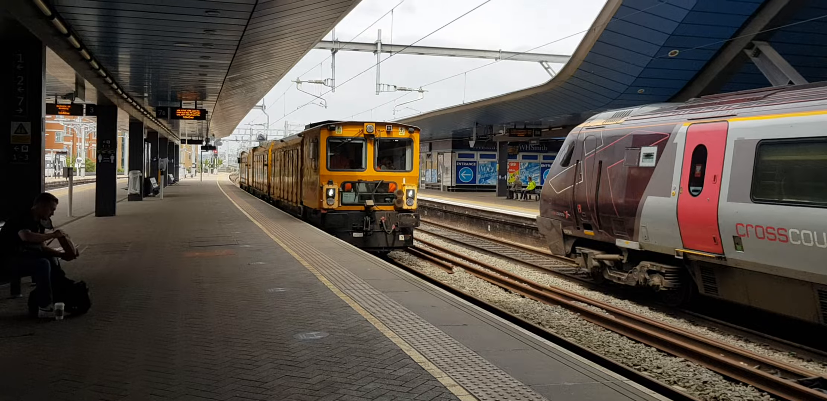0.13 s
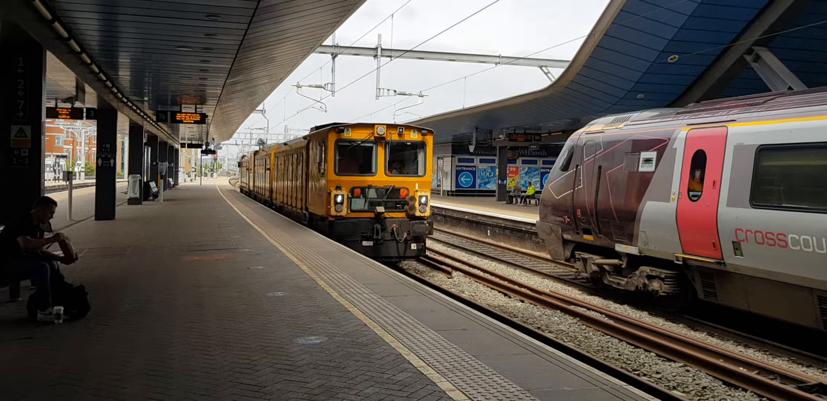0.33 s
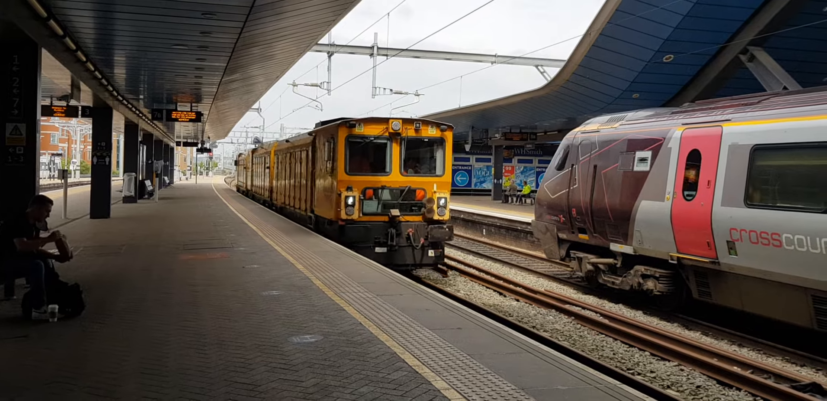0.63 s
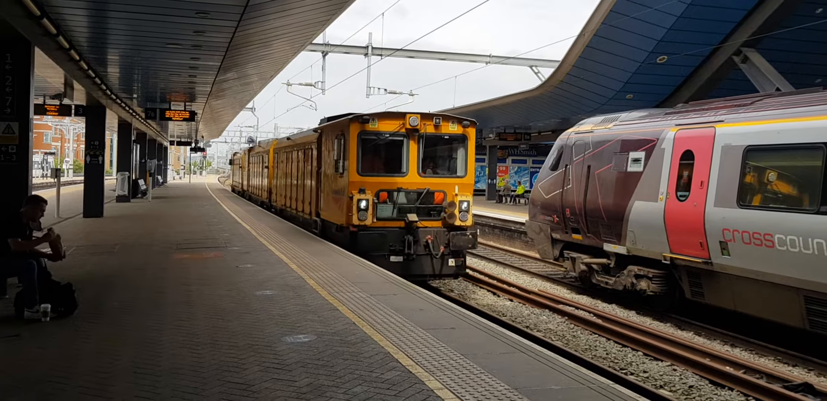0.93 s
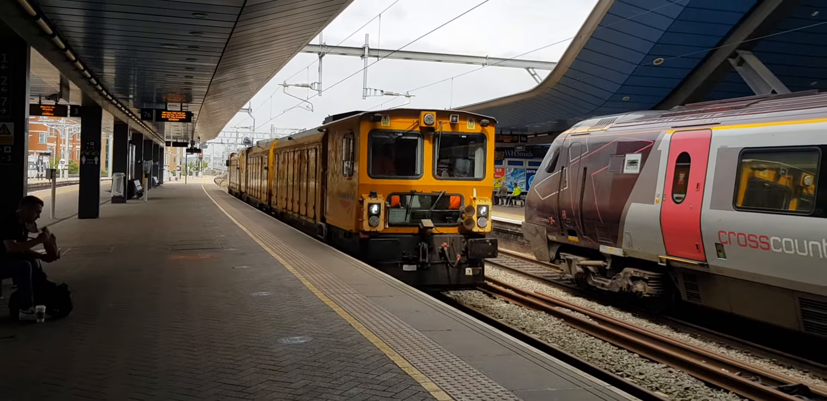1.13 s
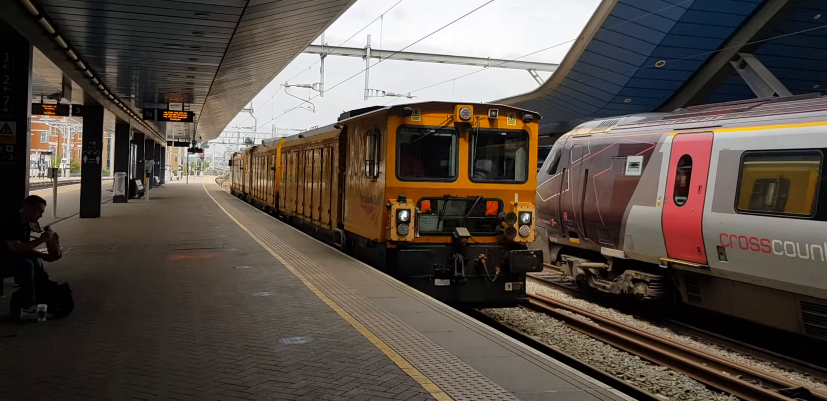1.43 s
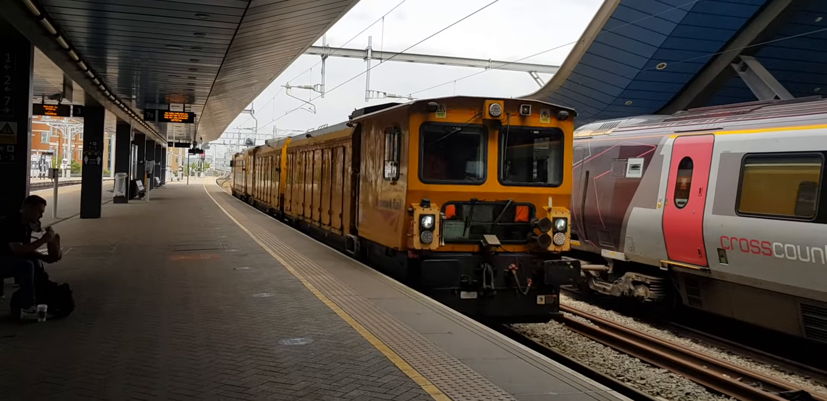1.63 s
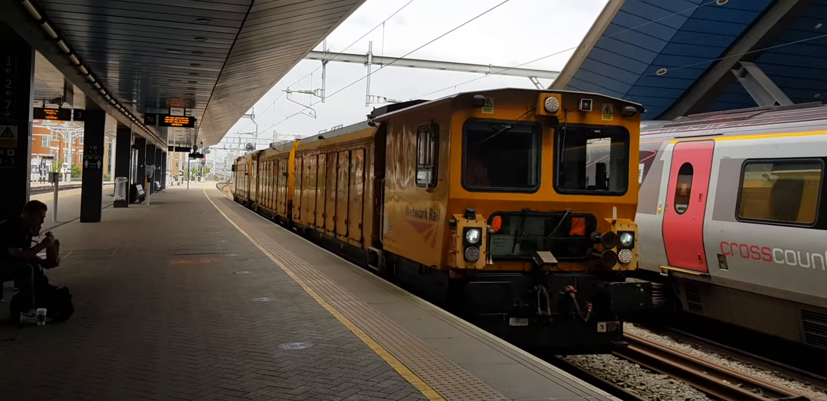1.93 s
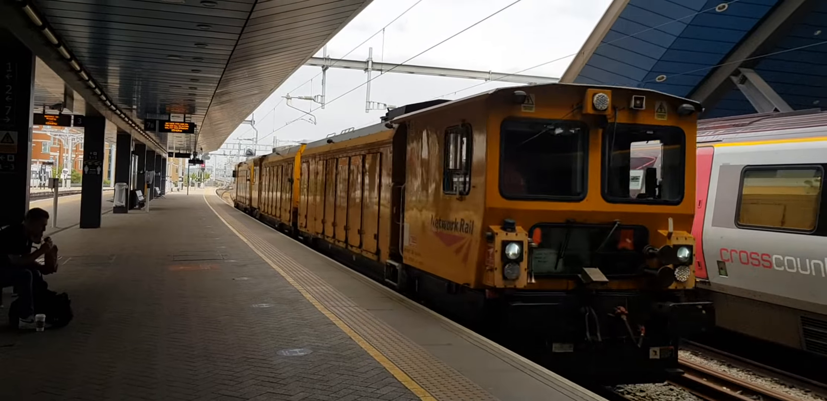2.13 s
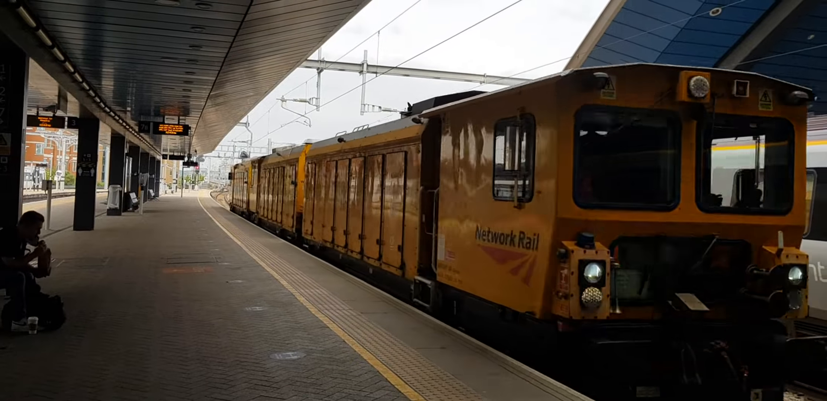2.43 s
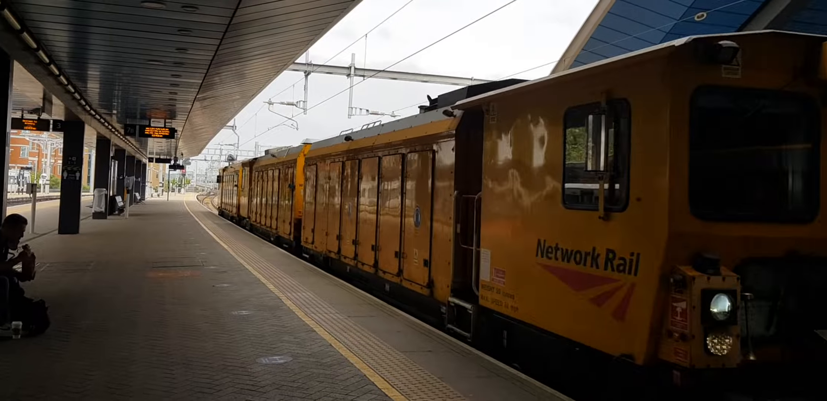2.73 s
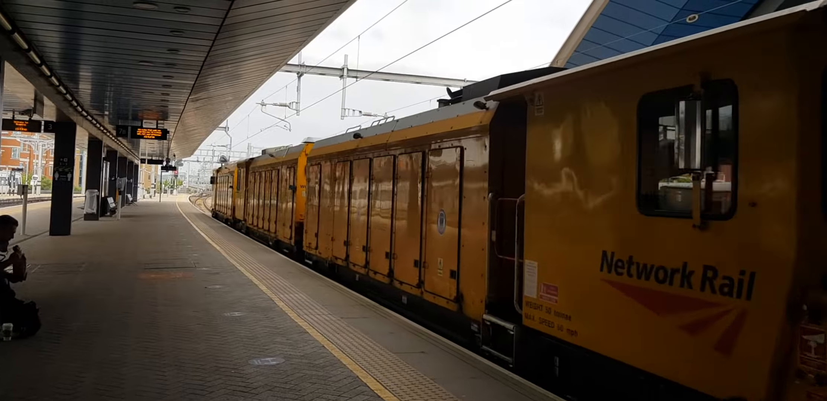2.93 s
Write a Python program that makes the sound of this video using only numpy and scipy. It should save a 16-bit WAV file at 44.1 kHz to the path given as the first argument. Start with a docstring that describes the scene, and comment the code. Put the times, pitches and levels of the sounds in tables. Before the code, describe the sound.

Steady diesel idling fills a covered station platform, bassy and droning, with flickering gear and fan whines above. A second train rolls in, its wheel rumble growing strongest at the end, heard in wide stereo from the platform.

```python
"""A covered station platform: diesel engines of a standing train idle steadily while a works train rolls closer.
The roar, rumble and beds of whine are filtered noise; whines and most hums are randomly modulated carriers.
Clatter is a noise loop repeated every engine cycle, and the exhausts are sums of harmonics of the cycle rate.
The sources are built as mid and side, and the two channels agree only in the bass, as in a diffuse field."""
import sys
import numpy as np
from scipy import signal
from scipy.fft import rfft, irfft, next_fast_len
from scipy.io import wavfile
from scipy.ndimage import uniform_filter1d, map_coordinates

SR = 44100
rng = np.random.default_rng(int(sys.argv[2]) if len(sys.argv) > 2 else 0)


def wrap_up_sound(samples):
    """Save the sound to the file named by the first command line argument, as 16-bit audio."""
    columns = np.atleast_2d(samples).T
    # keep every value between -1 and 1, then stretch to whole-number steps
    tamed = np.clip(columns, -1, 1)
    steps = np.round(tamed * 32767).astype(np.int16)
    wavfile.write(sys.argv[1], SR, steps)


N = 136710  # samples


def amp(db):
    """Level law: the amplitude ratio of a level in dB."""
    return 10 ** (np.asarray(db) / 20)


def unit(x):
    """Power normalisation: scale the whole signal to an rms of 1."""
    return x / np.sqrt(np.mean(x ** 2) + 1e-20)


def along(points, hz):
    """Logarithmic pitch: interpolate (Hz, value) points on a log frequency axis."""
    point_hz, value = np.transpose(points)
    return np.interp(np.log(hz + 1), np.log(point_hz + 1), value)


def clock():
    """Uniform sampling: the time of each sample in seconds."""
    return np.arange(N) / SR


def wobble(knots_per_s):
    """Band-limited fluctuation: a smooth curve through random knots."""
    knots = rng.standard_normal(int(N * knots_per_s / SR) + 4)
    return map_coordinates(knots, [np.arange(N) * knots_per_s / SR])


def filtered(x, response):
    """Linear filtering: multiply the spectrum by a function of frequency."""
    size = next_fast_len(N + 8192)
    spectrum = rfft(x, size) * response(np.fft.rfftfreq(size, 1 / SR))
    return irfft(spectrum, size)[..., :N]


def patches(pair, patchy_db):
    """Local modulation: random gain in patches of time and frequency, shared by mid and side."""
    bins = signal.stft(pair, nperseg=1024)[2]
    field = uniform_filter1d(rng.standard_normal(bins.shape[1:]), size=9, axis=0)  # across frequency
    field = uniform_filter1d(field, size=7, axis=1)  # across time
    return signal.istft(bins * amp(patchy_db * unit(field)), nperseg=1024)[1][:, :N]


def rush(colour, patchy_db):
    """Coloured noise: independent mid and side shaped by a spectrum, with an rms of 1."""
    white = rng.standard_normal((2, N))
    return unit(filtered(patches(white, patchy_db), lambda hz: amp(along(colour, hz))))


def narrow(hz, width_hz, seconds):
    """Quadrature modulation: slow random weights on cosine and sine spread a line about hz."""
    turn = 2 * np.pi * hz * seconds
    mid_and_side = [wobble(width_hz) * np.cos(turn) + wobble(width_hz) * np.sin(turn) for _ in range(2)]
    return unit(np.array(mid_and_side))


def panned(pair, left_db):
    """Level panning: tilt a mid and side pair by its left over right level."""
    left = amp(left_db / 2) * (pair[0] + pair[1])
    right = amp(-left_db / 2) * (pair[0] - pair[1])
    return np.array([left + right, left - right]) / 2


# The idling engine, six firings a cycle.
# Each row: time in seconds, four-stroke cycle rate in Hz.
IDLE_SPEED = [(0, 8.291), (1.2, 8.296), (1.6, 8.312), (3.1, 8.307)]


def cycles():
    """Phase as integrated rate: engine cycles completed at each moment."""
    s, hz = np.transpose(IDLE_SPEED)
    return np.cumsum(np.interp(clock(), s, hz)) / SR


# The approach of the works train. Each row: time in seconds, nearness in dB.
APPROACH_DB = [(0, -4.5), (1.0, -5.5), (1.8, -2), (2.3, -2.5), (2.7, 2), (3.1, 4.5)]


def nearness():
    """Level growth on approach: the nearness in dB at each moment."""
    s, db = np.transpose(APPROACH_DB)
    return np.interp(clock(), s, db)


# The colour of the roar. Each row: frequency in Hz, relative density in dB per Hz.
ROAR_COLOUR = [(15, -40), (28, -17), (40, -12), (60, -12.5), (100, -11.5), (175, -7.5), (240, -12),
               (440, -17), (620, -19), (740, -18), (900, -17.5), (1020, -18), (1100, -21.5), (1230, -21.5),
               (1310, -26), (1700, -22), (1980, -28), (2300, -27), (2900, -30.5), (3300, -30.5),
               (3930, -37.5), (5000, -39), (6800, -44), (7800, -50.5), (8800, -46.5), (11000, -51.5),
               (14000, -57.5), (14800, -60), (15600, -66)]
# Its throb with the engine. Each row: multiple of the cycle rate, modulation depth as a fraction.
THROB_DEPTHS = [(2, 0.019), (6, 0.05), (9, 0.057), (11, 0.19), (13, 0.035), (15, 0.068)]
# The edges of the throbbing band: lower in Hz, upper in Hz (half gain at each edge's own slope).
THROB_EDGES_HZ = (300, 1900)
ROAR_DB = -25.5


def roar():
    """Reverberant noise under the roof: its middle band is amplitude modulated by the engine cycle."""
    turns = cycles()
    throb = sum(depth * np.sin(2 * np.pi * (k * turns + rng.random())) for k, depth in THROB_DEPTHS)
    noise = rush(ROAR_COLOUR, patchy_db=0.62)
    low_hz, high_hz = THROB_EDGES_HZ
    clatter = filtered(noise, lambda hz: 1 / (1 + (low_hz / (hz + 1)) ** 4) / (1 + (hz / high_hz) ** 2))
    level_db = ROAR_DB + 0.086 * wobble(2.2) + 0.21 * wobble(12)
    return amp(level_db) * (noise + throb * clatter)


# Whines of fans and gears, and fuzzy lines of the idling engines. # Each row: frequency in Hz, width in Hz,
# level in dB, left over right in dB, growth in dB per dB of nearness.
WHINES = [(165.7, 4, -38, -0.5, 0), (381.4, 6.03, -43.5, -0.5, -0.06), (682, 16, -47, -0.5, 0),
          (825, 50, -43.5, -4, 0), (985, 65, -43, 3.5, 0), (1053, 12, -42, -2.5, 0.43),
          (1740, 70, -48, 3.5, 0.05), (1750, 18, -52, -3, 0)]
# A gear whine and its skirt. Each row: frequency in Hz, width in Hz, left over right in dB.
GEAR_LINES = [(2124, 32, -2), (2108, 80, -2)]
# A fan band and a beaded fan tone. Each row: frequency in Hz, width in Hz, left over right in dB.
FAN_LINES = [(3040, 170, 3), (3160, 55, 5.5)]
# Levels over time. Each row: time in seconds, gear whine in dB, fan band in dB, fan tone in dB.
GEAR_AND_FAN_LEVELS = [(.1, -45.5, -48, -48), (.5, -43.5, -50, -51), (.9, -41.5, -46.5, -50.5),
                       (1.3, -44, -47.5, -48.5), (1.5, -42.5, -44, -51), (1.7, -41, -52, -52),
                       (2.1, -41, -52, -54), (2.5, -43.5, -46, -54), (2.8, -43, -50, -50),
                       (3.1, -45, -49, -51)]
SKIRT_DB = -.8  # skirt relative to the gear line, before both are scaled together
GEAR_RISE_PER_S = .002  # fractional rise of pitch
GEAR_FLICKER_DB, GEAR_FLICKER_PER_S = 2.5, 9  # the whine sings in and out


def whines():
    """Narrow-band noise: fuzzy lines of fans, gears and engines that stand over the roar."""
    t = clock()
    near_db = nearness()
    s, gear_db, *fan_db = np.transpose(GEAR_AND_FAN_LEVELS)
    out = np.zeros((2, N))
    for hz, width_hz, db, left_db, grows in WHINES:
        out += amp(db + grows * near_db) * panned(narrow(hz, width_hz, t), left_db)
    for (hz, width_hz, left_db), db in zip(FAN_LINES, fan_db):
        out += amp(np.interp(t, s, db)) * panned(narrow(hz, width_hz, t), left_db)

    climb = t + GEAR_RISE_PER_S * (t - t.mean()) ** 2 / 2
    gear = np.zeros((2, N))
    for (hz, width_hz, left_db), db in zip(GEAR_LINES, (0, SKIRT_DB)):
        gear += amp(db) * panned(narrow(hz, width_hz, climb), left_db)
    flickering = gear * amp(GEAR_FLICKER_DB * wobble(GEAR_FLICKER_PER_S))
    return out + amp(np.interp(t, s, gear_db)) * unit(flickering)


# Wheel rumble. Each row: frequency in Hz, relative density in dB per Hz.
RUMBLE_COLOUR = [(50, -23), (90, 6.5), (130, 0), (200, -2.5), (300, 1), (550, -8.5), (850, -7.5),
                 (1500, -18), (3000, -43), (8000, -90)]
# Hum of the rolling train; the first row is played as a pure tone, so its width goes unused.
# Each row: frequency in Hz, width in Hz, level in dB, growth in dB per dB of nearness.
HUMS = [(90.2, .6, -30, 1.02), (274.7, 6.91, -40.5, 0.93), (343.3, 2.51, -38, 0.78),
        (542, 8.01, -42.5, 1.24)]
RUMBLE_DB = -29.5  # at a nearness of 0 dB
HUM_RISE_PER_S = 0.00395  # fractional: the hum sharpens as the train gathers speed


def rolling():
    """Rolling noise with tonal hum: both grow as the works train nears."""
    near_db, t = nearness(), clock()
    climb = t + HUM_RISE_PER_S * (t - 1.5) ** 2 / 2
    hz, _, db, grows = HUMS[0]
    turn = 2 * np.pi * hz * climb
    pure_tone = np.sqrt(2) * np.array([np.sin(turn), np.cos(turn)])
    hum = amp(db + grows * near_db + 2.8 * wobble(3.65)) * pure_tone
    for hz, width_hz, db, grows in HUMS[1:]:
        hum += amp(db + grows * near_db) * narrow(hz, width_hz, climb)
    rumble_db = RUMBLE_DB + near_db + 1.7 * wobble(6.67)
    return hum + amp(rumble_db) * rush(RUMBLE_COLOUR, patchy_db=1.0)


# Engine clatter; nothing sounds outside the first and last frequency.
# Each row: frequency in Hz, relative level in dB per line.
KNOCK_COLOUR = [(200, -1), (400, -15), (600, -5.5), (820, -2), (1050, -2.5), (1400, -11)]
KNOCK_DB, KNOCK_PATCHY_DB = -38.5, 3


def knock():
    """Periodic noise has a line spectrum: random clatter repeats every cycle, recoloured in patches."""
    size = 4096  # points in one cycle
    place = (cycles() + 0.0071 * wobble(2.5)) % 1 * size
    loops = np.array([np.interp(place, np.arange(size), rng.standard_normal(size)) for _ in range(2)])

    def band(hz):
        inside = (hz > KNOCK_COLOUR[0][0]) * (hz < KNOCK_COLOUR[-1][0])
        return amp(along(KNOCK_COLOUR, hz)) * inside

    return amp(KNOCK_DB) * unit(filtered(patches(loops, KNOCK_PATCHY_DB), band))


# Rates of level waver: knots per second for multiples up to 40, knots per second for those above.
WAVER_PER_S = (2.6, 7)
WAVER_MOST_DB = 3


def exhaust(orders_db, speed, waver_db, drift):
    """Harmonic series of a periodic source: wavering multiples of the cycle rate; the side has other phases."""
    turn = 2 * np.pi * speed * cycles() + drift * wobble(1.48)  # drift in radians
    out = np.zeros((2, N))
    for k, db in orders_db:
        phase = k * turn + 2 * np.pi * rng.random((2, 1))
        waver = wobble(WAVER_PER_S[int(k > 40)])
        out += amp(db + min(k * waver_db, WAVER_MOST_DB) * waver) * np.sqrt(2) * np.sin(phase)
    return out


# Exhaust of the nearest idling engine. Each row: multiple of the cycle rate, relative level in dB.
NEAR_ORDERS = [(4, -24), (5, -33), (6, 0), (7, -21), (8, -24), (9, -18), (10, -26), (12, -22), (14, -11.5),
               (15, -22), (16, -25), (18, -13), (20, -17), (21, -19.5), (22, -13), (24, -13), (27, -24.5),
               (30, -20.5), (38, -24.5), (46, -27.5), (90, -26.5), (96, -22), (102, -23), (111, -23.5)]
# Exhaust of an engine further along. Each row: multiple of its own cycle rate, relative level in dB.
FAR_ORDERS = [(18, -13), (19, -11.5), (22, -3.5), (24, 0)]
NEAR_DB, NEAR_WAVER_DB = -21, .06  # waver in dB per multiple: higher ones are less steady
FAR_DB, FAR_WAVER_DB = -36, 0.5
FAR_SLOWER = .9875  # speed ratio to the near engine


def engines():
    """Beating of mistuned sources: the near engine's full firing note against a slightly slower one."""
    near = exhaust(NEAR_ORDERS, 1, NEAR_WAVER_DB, drift=.012)
    far = exhaust(FAR_ORDERS, FAR_SLOWER, FAR_WAVER_DB, drift=.02)
    return amp(NEAR_DB) * near + amp(FAR_DB) * far


# Gain of the side signal. Each row: frequency in Hz, gain in dB.
SIDE_GAIN = [(60, -24), (99, -31), (160, -13), (270, -18), (450, -8), (740, -5.5), (1220, 2.5), (2010, 2),
             (3330, -1), (5500, 0.5), (9080, 0.5), (15000, 0)]
# Lead of the right channel. Each row: frequency in Hz, share of the mid put in the side a quarter cycle off.
RIGHT_LEAD = [(400, 0.0075), (700, .15), (1000, .3), (1300, 0)]
# Balance of the channels. Each row: frequency in Hz, left over right in dB.
LEFT_BALANCE = [(60, 1.6), (250, 2), (600, 2), (800, 1.5), (1000, 2.5), (1300, 0), (1700, -1.5),
                (2600, -1.5), (3200, -0.5), (4000, 0), (6000, -2), (7200, -1), (8000, -2), (9000, 5),
                (11000, -1), (15000, 0.5)]


def scene():
    """Diffuse-field coherence: the sources share a side that is weak in the bass and full in the treble."""
    mid, side = roar() + whines() + rolling() + knock() + engines()
    lead = filtered(mid, lambda hz: 1j * along(RIGHT_LEAD, hz))
    side = filtered(side, lambda hz: amp(along(SIDE_GAIN, hz))) - lead
    channels = np.array([mid + side, mid - side])
    return filtered(channels, lambda hz: amp(np.outer([.5, -.5], along(LEFT_BALANCE, hz))))


START_S, FADE_S = .1052, .0015  # silence before the sound, then its fade-in
TOP_HZ = 15730


def record(dry):
    """Gating and band limiting: a silent start, a short linear fade-in, and nothing above the top frequency."""
    gate = np.clip((clock() - START_S) / FADE_S, 0, 1)
    return filtered(dry * gate, lambda hz: hz < TOP_HZ)


dry = scene()
out = record(dry)
wrap_up_sound(out)
```